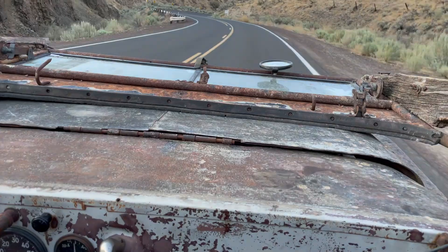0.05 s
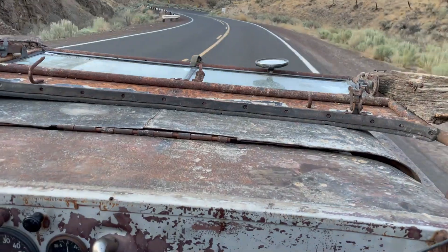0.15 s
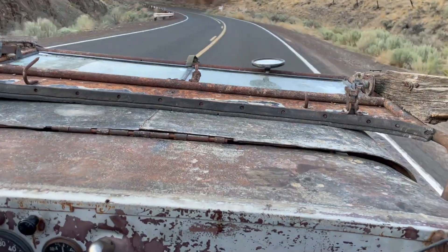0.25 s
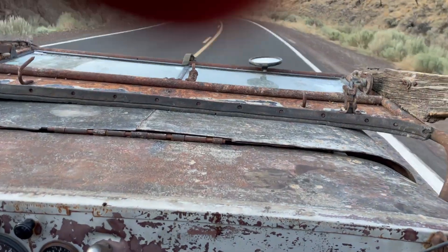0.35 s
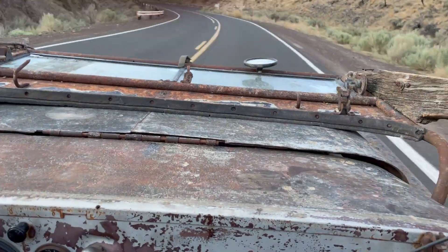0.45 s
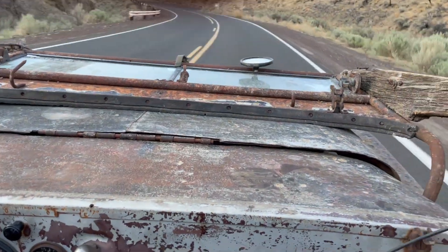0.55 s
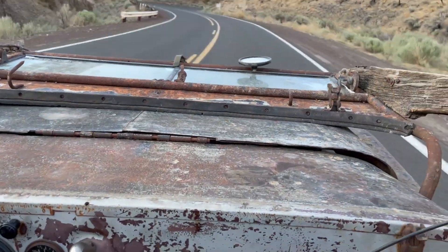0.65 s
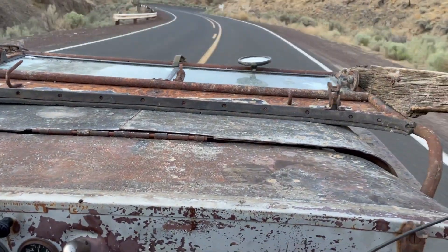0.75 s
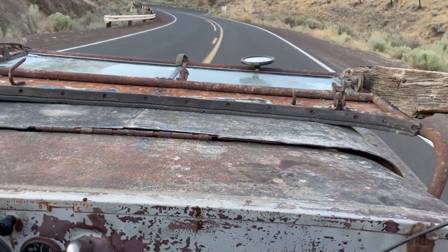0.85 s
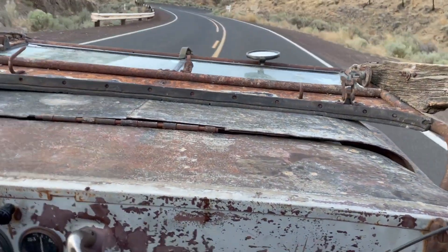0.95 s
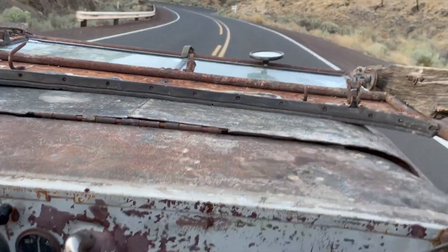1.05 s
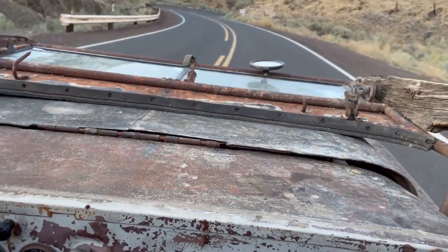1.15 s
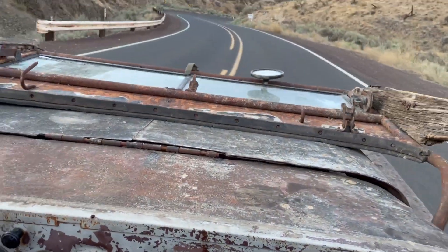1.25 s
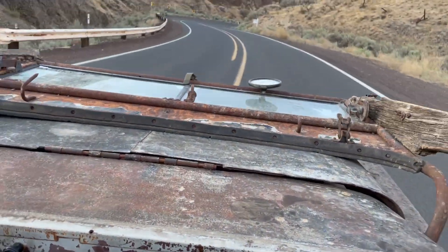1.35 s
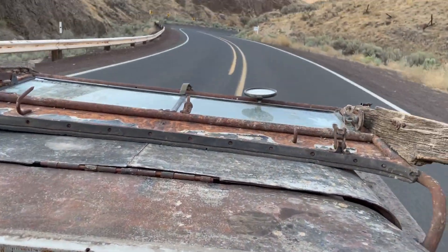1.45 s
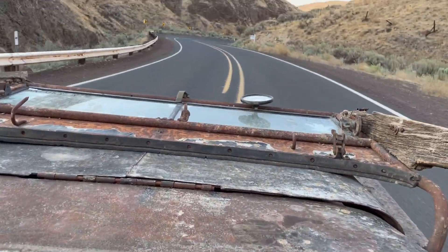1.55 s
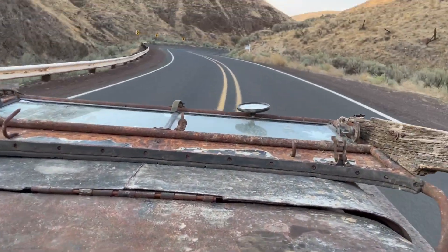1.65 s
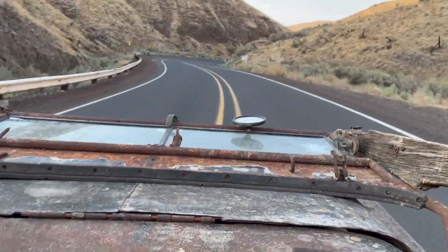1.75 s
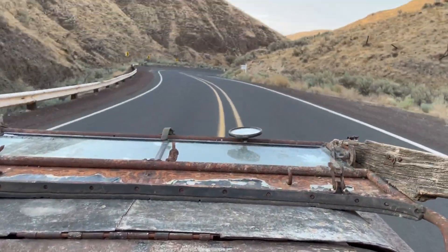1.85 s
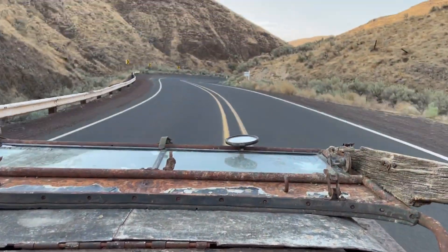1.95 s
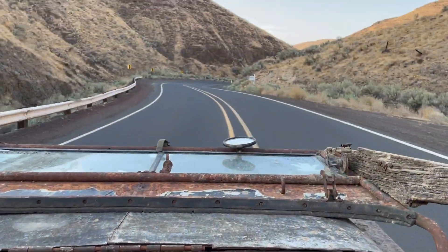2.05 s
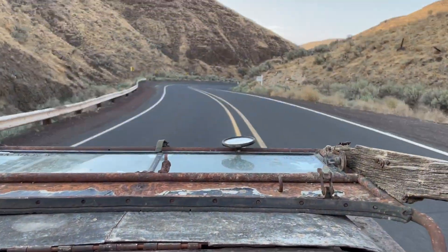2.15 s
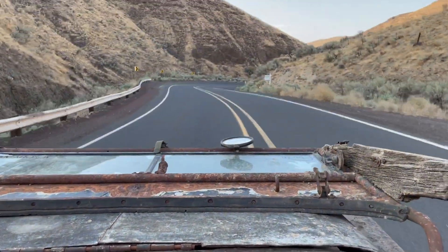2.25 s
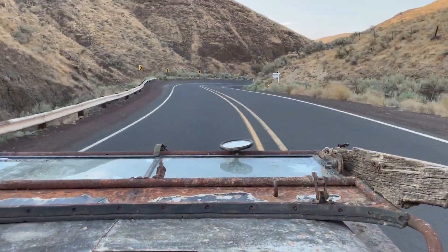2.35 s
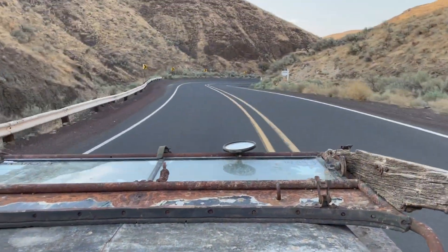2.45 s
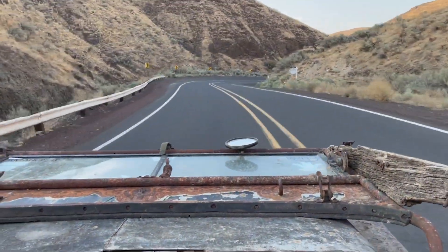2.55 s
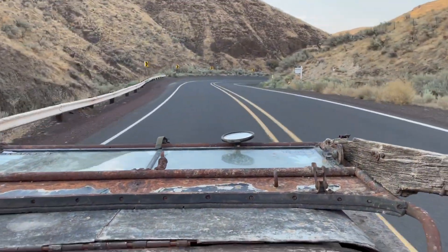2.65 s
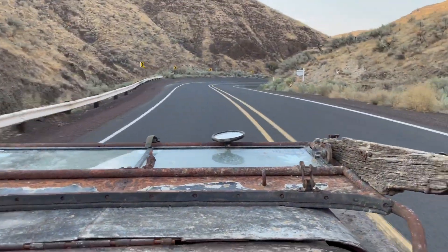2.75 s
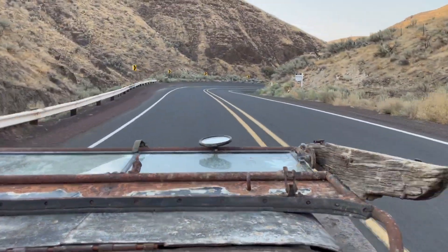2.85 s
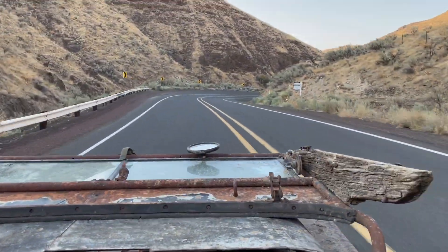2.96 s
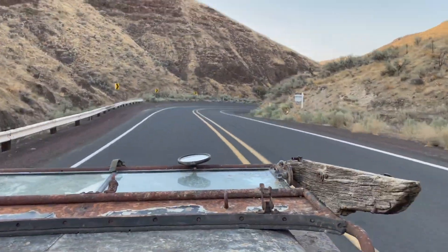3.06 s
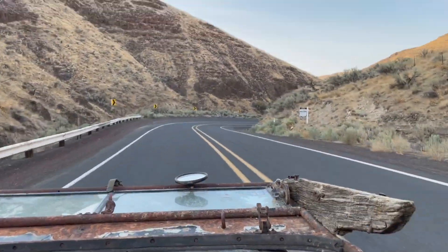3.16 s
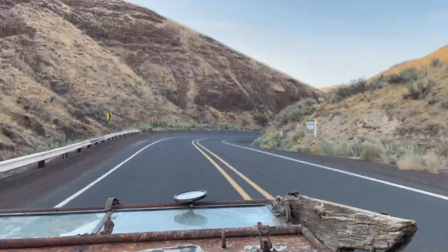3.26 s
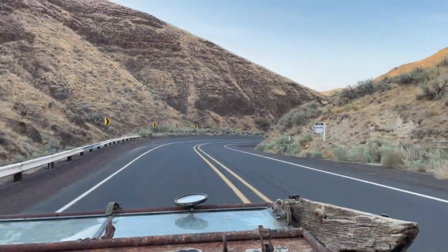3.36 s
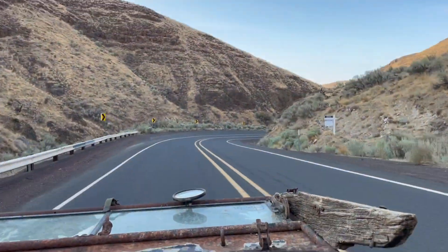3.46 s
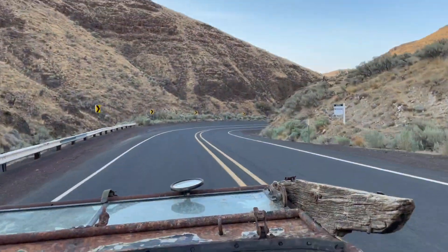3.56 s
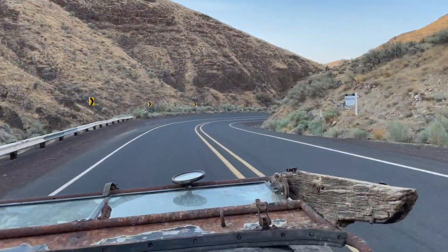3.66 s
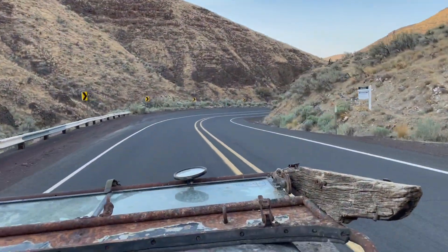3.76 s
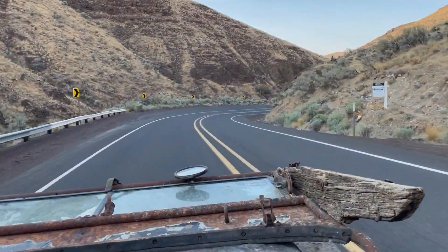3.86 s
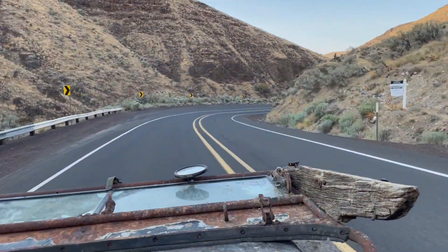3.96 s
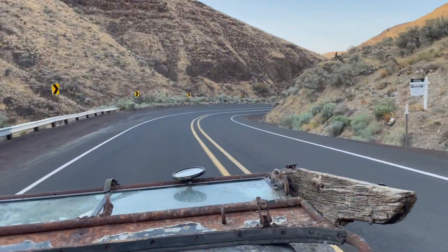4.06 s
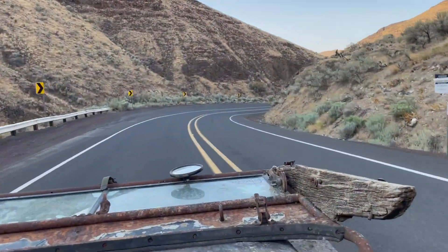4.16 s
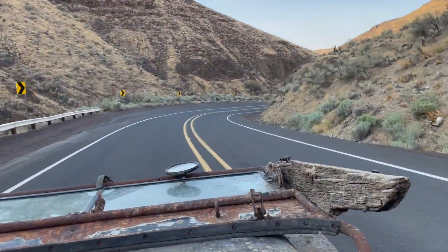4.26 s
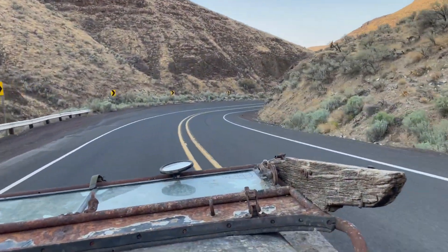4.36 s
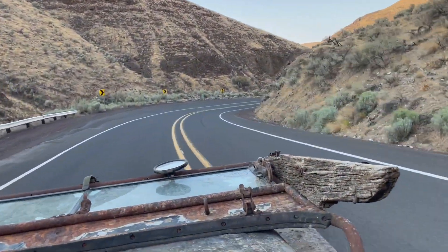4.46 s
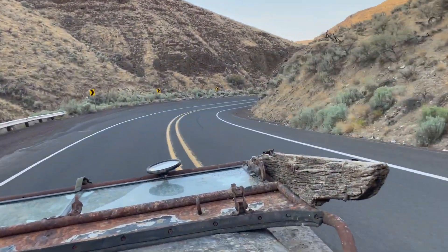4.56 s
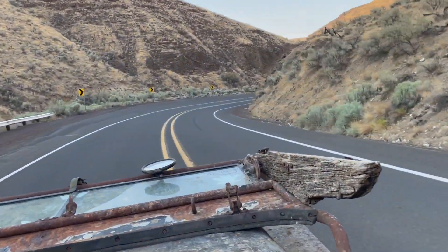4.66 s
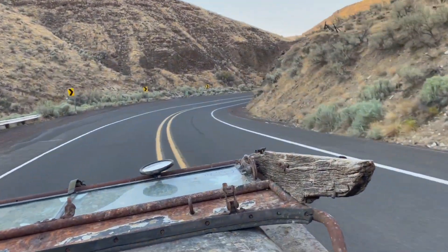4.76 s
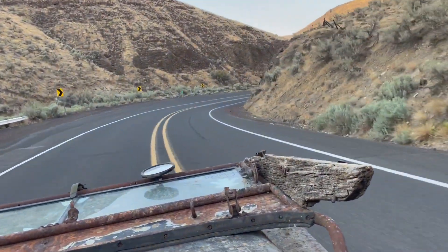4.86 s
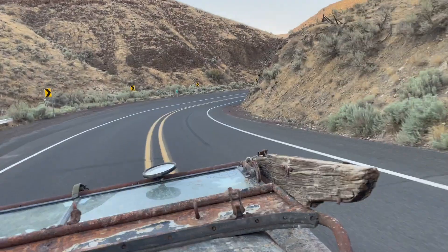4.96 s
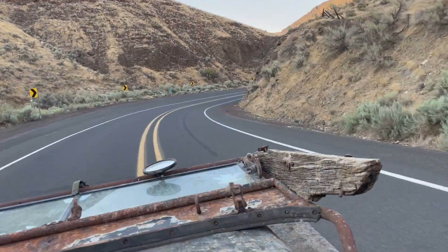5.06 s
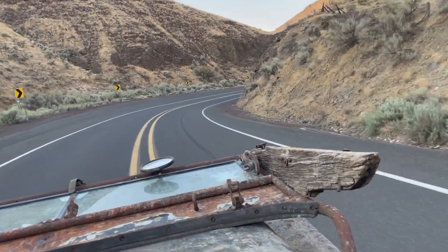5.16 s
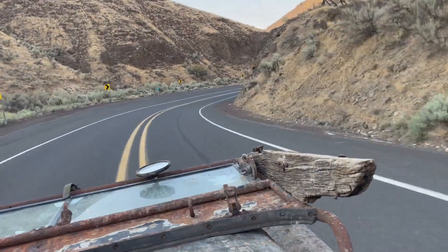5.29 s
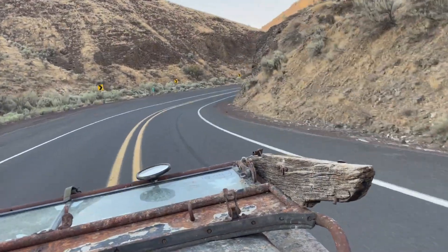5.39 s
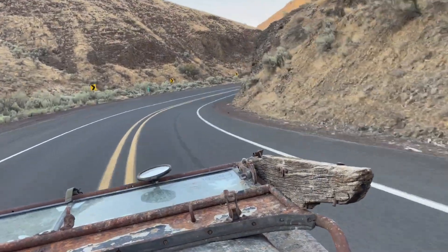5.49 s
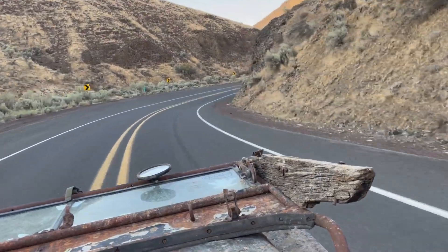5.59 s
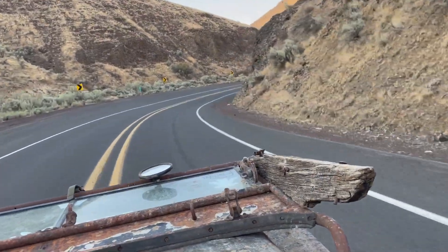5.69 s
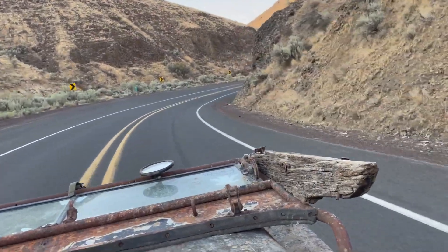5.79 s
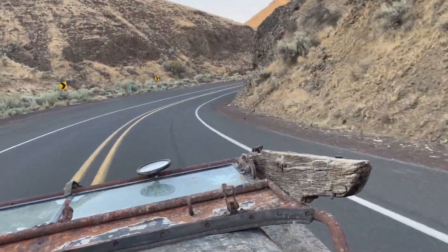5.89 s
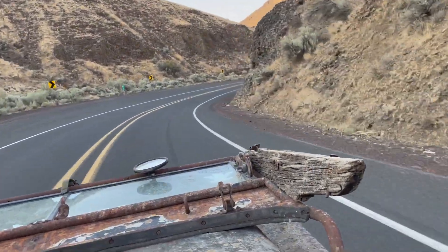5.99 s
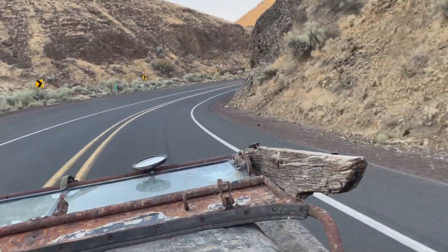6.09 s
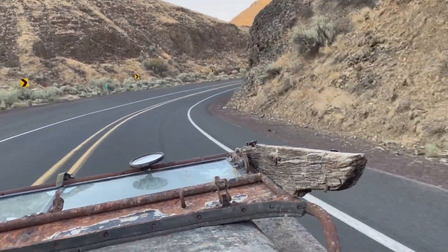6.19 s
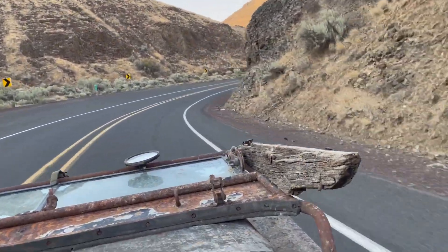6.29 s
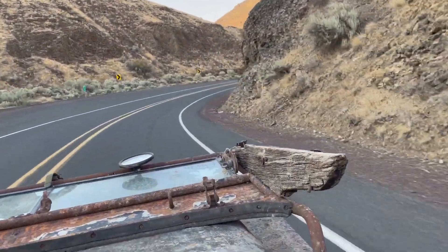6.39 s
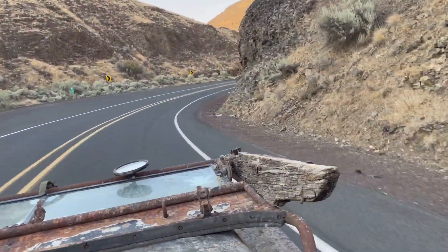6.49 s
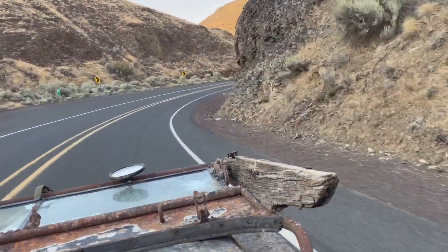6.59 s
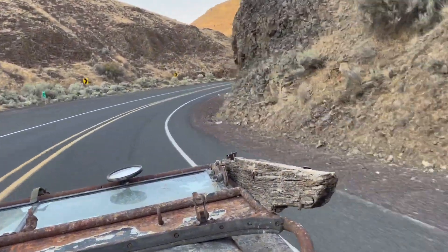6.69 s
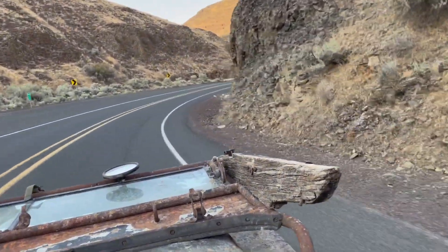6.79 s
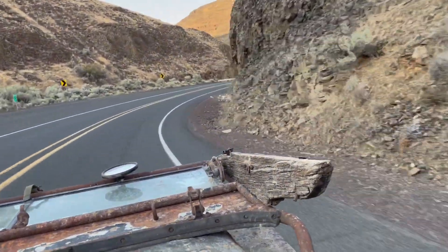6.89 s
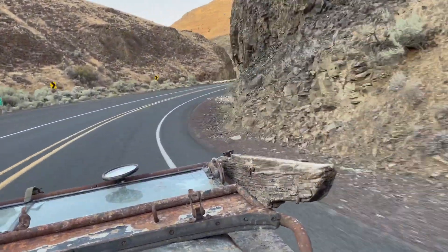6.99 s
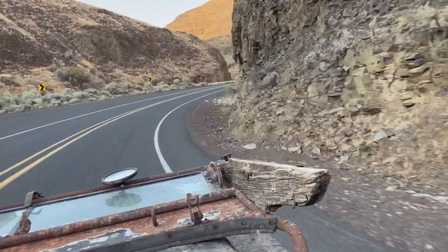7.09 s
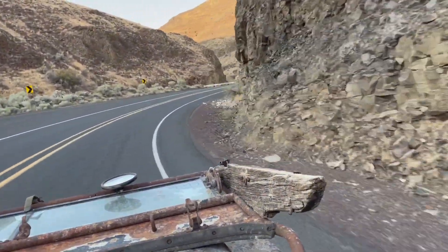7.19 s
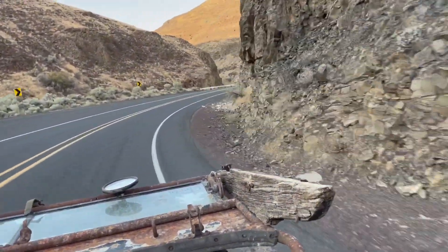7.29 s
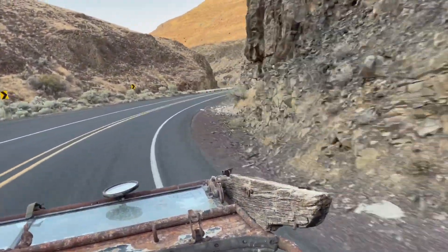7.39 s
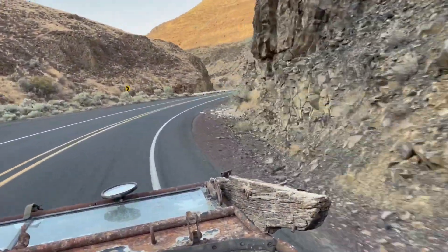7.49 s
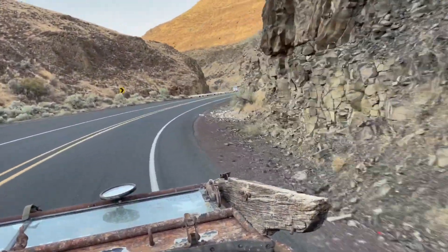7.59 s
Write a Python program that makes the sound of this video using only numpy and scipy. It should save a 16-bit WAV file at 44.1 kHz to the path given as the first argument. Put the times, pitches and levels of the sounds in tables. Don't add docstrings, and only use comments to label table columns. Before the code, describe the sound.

Strong wind buffets the microphone on a fast open vehicle, roaring, thumping and crackling over a steady low rumble of engine and tyres.

```python
import sys
import numpy as np
from scipy import signal
from scipy.fft import rfft, irfft, next_fast_len
from scipy.io import wavfile
from scipy.ndimage import uniform_filter1d

SR = 44100
rng = np.random.default_rng(int(sys.argv[2]) if len(sys.argv) > 2 else 0)


def makeup_ratio(level_db):
    decades = np.asarray(level_db, float) / 20
    return 10 ** decades


def output_pcm(signal):
    pcm = np.clip(np.atleast_2d(signal).T, -1, 1) * 32767
    wavfile.write(sys.argv[1], SR, np.round(pcm).astype(np.int16))


N = 336686
M = next_fast_len(N)
HZ = np.fft.rfftfreq(M, 1 / SR)

# [f/Hz, level/dB per Hz]
ROAD_SUM = [(24, -36), (40, -1.5), (97, -11), (239, -10), (406, -15), (473, -15), (865, -12.5), (1750, -19),
            (5580, -40.5), (6660, -38.5), (8790, -49), (11600, -46.5), (13500, -52), (14500, -96),
            (16500, -101)]
# [f/Hz, level/dB per Hz]
ROAD_DIFF = [(24, -32), (40, -13), (75, 1), (252, -9), (593, -2.5), (1110, -6.5), (3130, -21.5),
             (5440, -36), (6500, -34.5), (8150, -32.5), (9970, -40), (11000, -85), (13200, -43),
             (14900, -44), (16500, -72)]
# [t/s, level/dB]
ROAD_HISS = [
    (0.1, -59),
    (0.68, -57.5),
    (5.66, -62),
    (6.01, -60.5),
    (6.68, -62),
    (7.06, -60),
    (7.63, -59.5),
]
# [t/s, share of the tyre hiss level]
TURN = [
    (0, 0.087),
    (4.3, .1),
    (6.3, 0.39),
    (7.63, 0.37),
]
# [t/s, gust level/dB]
GUST = [(0.04, -22.5), (0.32, -19.5), (0.88, -19.5), (1.16, -15), (1.45, -12.5), (1.85, -16), (2.4, -14),
        (2.85, -14.5), (3.41, -12.5), (3.69, -18.5), (4.4, -19.5), (4.82, -18.5), (5.5, -20.5),
        (5.94, -17.5), (6.3, -26.5), (6.6, -22.5), (7.07, -19.5), (7.63, -20)]
# [t/s, left over right/dB]
SWING = [
    (0, -2),
    (2, -10),
    (7.63, -14),
]
# [f/Hz, level/dB per Hz]
WIND = [(18, -41), (30, -14), (54, 5), (75, 4.5), (150, -2), (451, -6), (829, -10.5), (1500, -17),
        (2500, -25.5), (3100, -31), (4160, -34), (5630, -40), (6600, -42.5), (8000, -60.5)]
# [f/Hz, likeness from 0 to 1]
SAME = [(60, 0.87), (180, 0.97), (550, 0.59), (1650, 0.14), (4970, 0.29), (15000, 0.04)]
# [f/Hz, left over right/dB]
LEAN = [(60, 1), (240, 2), (950, 1.5), (3770, 5), (15000, 12)]
# [peak t/s, level/dB, brightness/dB, length/s]
ROLLS = [(0.428, -15.5, -17, 0.061), (0.598, -18, -2.5, 0.019), (0.641, -25, -2, 0.027),
         (0.888, -11, -11.5, .025), (1.085, -6, -16.5, 0.016), (1.286, -10.5, -14.5, 0.039),
         (1.356, -12.5, -11, .046), (1.719, -16, -9.5, 0.063), (1.815, -7.5, -17, 0.027),
         (2.158, -11, -15, 0.046), (2.501, -9, -15, 0.051), (2.853, -10, -11.5, 0.047),
         (3.044, -12, -14, 0.051), (3.328, -14.5, -11, 0.051), (3.958, -13, -15.5, 0.034),
         (4.117, -16.5, -14, 0.065), (4.3, -16, -13, 0.018), (4.422, -13.5, -13.5, 0.027),
         (4.587, -13.5, -10.5, 0.024), (4.856, -12.5, -17, 0.093), (4.957, -14, -14.5, 0.065),
         (5.244, -9.5, -21, 0.054), (5.381, -12, -14.5, 0.04), (5.766, -10.5, -15, 0.023),
         (5.94, -7.5, -16, 0.017), (6.044, -15.5, -14, 0.017), (6.198, -19, -17, 0.045),
         (6.298, -16, -14.5, 0.024), (6.691, -16.5, -13, 0.018), (7.155, -7.5, -25, 0.016)]
# [peak t/s, level/dB, brightness/dB]
SLAPS = [(0.205, -17, -9), (0.702, -15.5, -22), (0.824, -14, -9), (1.007, -9, -15), (1.055, -13.5, -11),
         (1.24, -12, -14), (1.437, -7.5, -26), (1.568, -17, -2), (1.665, -21.5, -1.5), (1.934, -7, -16.5),
         (2.075, -8.5, -17), (2.106, -9.5, -18), (2.601, -7, -23), (2.668, -11.5, -11), (2.765, -15, -12),
         (2.977, -10, -13), (3.106, -5, -16.5), (3.248, -9.5, -10), (3.503, -9, -17), (3.846, -14, -16),
         (3.906, -10.5, -11.5), (4.524, -18, -6), (4.706, -11, -22), (5.033, -8.5, -24),
         (5.148, -10, -14.5), (5.445, -15, -17), (5.898, -11.5, -38), (6.846, -14.5, -12),
         (7.016, -10.5, -26), (7.06, -24, -3)]
# [t/s, peak level/dB, pitch f/Hz, port: 1 left, -1 right]
POPS = [(0.457, -10, 2200, 1), (0.5758, -7.5, 2420, 1), (0.6217, -7.5, 2220, 1), (3.253, -14, 3000, 1),
        (0.925, -10.5, 2480, 1), (0.9872, -11.5, 3330, 1), (1.1834, -13, 3460, 1), (1.3704, -5, 2730, 1),
        (2.8475, -10, 2950, 1), (1.5578, -6, 2950, 1), (1.7992, -7, 2650, 1), (1.963, -9.5, 2590, 1),
        (2.0668, -10, 3010, 1), (2.142, -9, 2780, 1), (2.182, -7, 2470, -1), (2.378, -5, 2470, 1),
        (2.734, -4, 2160, 1), (2.7415, -11, 2480, -1), (3.039, -15, 2700, -1), (3.8055, -16, 2410, -1),
        (4.526, -12, 2430, 1), (4.5859, -16, 2410, -1), (4.5934, -8, 3460, 1), (4.9124, -8.5, 2770, 1),
        (5.1932, -7, 2280, 1), (5.3587, -12, 2790, -1), (5.9407, -18, 2550, 1), (6.871, -14, 3040, 1),
        (7.0508, -7, 2860, 1), (7.066, -19, 2420, -1)]
# [f/Hz, width/Hz, depth/dB]
NULLS_SUM = [(5460, 570, -2.5), (8300, 770, -4), (15200, 1200, -9)]
# [f/Hz, width/Hz, depth/dB]
NULLS_DIFF = [(4300, 300, -5), (6700, 300, -4), (11500, 1000, -4)]

START_S = 0.0355
TOP_HZ = 15830
USUAL_DB = -18
FIZZ_DB, FIZZ_SLOPE = -10.5, -0.12
THUD_DB, THUD_SLOPE = -22.5, 0.77
SLAP_S = 0.013
EDDY_SIDE = 0.54
FAR_PORT_DB = -8.5


def evened(x):
    return x / np.sqrt(np.mean(x ** 2) + 1e-20)


def read(points, hz):
    f, value = np.transpose(points)
    return np.interp(np.log(hz + 1), np.log(f + 1), value)


def follow(table):
    s, value = np.transpose(table)
    return np.interp(np.arange(N) / SR, s, value)


def band(lo_hz, hi_hz):
    low_edge = 1 + (lo_hz / (HZ + 1)) ** 4
    high_edge = 1 + (HZ / hi_hz) ** 4
    return 1 / np.sqrt(low_edge * high_edge)


def flutter(lo_hz, hi_hz, rows):
    z = rfft(rng.standard_normal((rows, M))) * band(lo_hz, hi_hz) / np.sqrt(HZ + 1)
    return evened(irfft(z, M)[:, :N])


def sides(pan_db):
    return makeup_ratio(np.array([pan_db / 2, -pan_db / 2]))


def road():
    colour = makeup_ratio(np.array([read(ROAD_SUM, HZ), read(ROAD_DIFF, HZ) - 7.0]))
    z = rfft(rng.standard_normal((2, M))) * colour
    hiss = irfft(z[0] * (abs(HZ - 11250) < 1750), M)
    level = makeup_ratio(follow(ROAD_HISS) - 2.0 + 2.5 * flutter(7.5, 34, 1))
    both, apart = irfft(z, M)[:, :N] / np.std(hiss) * level
    return np.array([both + apart, both - apart])


def turned_hiss():
    hiss = irfft(rfft(rng.standard_normal(M)) * (abs(HZ - 8400) < 700), M)[:N]
    return follow(TURN) * evened(hiss) * makeup_ratio(follow(ROAD_HISS))


def airstream():
    roar_db = follow(GUST)
    over_db = roar_db - USUAL_DB
    fizz_db = roar_db + FIZZ_DB + FIZZ_SLOPE * over_db
    thud_db = THUD_DB + THUD_SLOPE * over_db
    return roar_db, fizz_db, thud_db


def eddies():
    roar, fizz = np.zeros((2, 2, N))
    slaps = [(*slap, SLAP_S) for slap in SLAPS]
    for s, db, bright_db, length in [*ROLLS, *slaps]:
        half = int(max(length, 0.004) * SR)
        at = np.clip(round(s * SR) + np.arange(-half, half), 0, N - 1)
        swell = np.hanning(2 * half) ** 0.71
        roar[:, at] += makeup_ratio(db - 3.0) * swell
        fizz[:, at] += makeup_ratio(db + bright_db + 1.0) * swell
    pan_db = EDDY_SIDE * follow(SWING)
    return roar * sides(0.24 * pan_db), fizz * sides(pan_db)


def pop(hz, edge_db):
    t = (np.arange(200) - 100) / SR
    ring = np.cos(2 * np.pi * (hz * t + rng.random())) * np.exp(-(t / 0.0003) ** 2)
    grit = rng.standard_normal((2, len(t)))
    dull_grit = signal.lfilter(*signal.butter(N=4, Wn=4800, fs=SR), grit[0])
    crack = evened(dull_grit) * np.exp(-(t / 0.0011) ** 2)
    edge = grit[1] * np.exp(-(t / 0.00047) ** 2)
    return makeup_ratio(0.5) * ring + makeup_ratio(-11.5) * crack + makeup_ratio(edge_db) * edge


def pops(burst_fizz):
    out = np.zeros((2, N + 200))
    for s, db, hz, port in POPS:
        port_gain = makeup_ratio(FAR_PORT_DB * np.array([port < 0, port > 0]))[:, None]
        edge_db = -31 + 1.2 * (db + 12) + (hz - 2700) / 150
        start = round(s * SR) - 100
        out[:, start:start + 200] += makeup_ratio(db - 1) * port_gain * pop(hz, edge_db)
    level = np.hypot(makeup_ratio(airstream()[1] - 3.5), burst_fizz)
    for hz in (1530, 2020, 2740, 3750, 5030):
        size = level * makeup_ratio(3.5 * np.minimum(rng.exponential(1, (2, N)), 3.5))
        train = size * (rng.random((2, N)) < 36 / SR)
        small = signal.oaconvolve(train, pop(hz, -45.0)[None])[:, :N]
        out[:, :N] += makeup_ratio(7.5 + read(WIND, hz) / 2) * small
    return out[:, :N]


def pair(gain):
    a, b = rfft(rng.standard_normal((2, M)))
    same = np.clip(read(SAME, HZ), -1, 1)
    lean = makeup_ratio(read(LEAN, HZ) / 2)
    left = a * lean
    right = (same * a + np.sqrt(1 - same ** 2) * b) / lean
    return evened(irfft(gain * np.array([left, right]), M)[:, :N])


def swirled(x, patchy_db, size):
    overlap = size * 3 // 4
    z = signal.stft(x, nperseg=size, noverlap=overlap)[2]
    patches = uniform_filter1d(rng.standard_normal(z.shape), size=4, axis=1)
    patches = evened(uniform_filter1d(patches, size=14, axis=2))
    z = z * makeup_ratio(patchy_db * patches)
    return evened(signal.istft(z, nperseg=size, noverlap=overlap)[1][:, :N])


def wind(burst_roar, burst_fizz):
    roar_db, fizz_db, thud_db = airstream()
    pan_db = follow(SWING)
    shared = flutter(7, 70, 1)
    own_roar, own_fizz = flutter(18, 200, 4).reshape(2, 2, N)
    colour = makeup_ratio(read(WIND, HZ))

    thud_level = makeup_ratio(thud_db + 2.9 * flutter(8.8, 23, 1))
    thud = pair(colour * band(15, 175)) * np.hypot(thud_level, 0.39 * burst_roar.mean(0))

    roar_level = makeup_ratio(roar_db - 4.0 + 2.64 * shared + 2.04 * own_roar) * sides(0.11 * pan_db)
    roar = swirled(pair(colour * band(188, 1115)), patchy_db=3.0, size=512)
    roar = roar * np.hypot(roar_level, burst_roar)

    fizz_level = makeup_ratio(fizz_db - 3.0 + 1.94 * shared + 3.05 * own_fizz) * sides(pan_db)
    fizz = swirled(pair(colour * band(1514, 12400)), patchy_db=3.5, size=256)
    fizz = fizz * np.hypot(fizz_level, burst_fizz)
    rasp = makeup_ratio(1.8 * flutter(66, 620, 2) - 0.4)
    return thud + roar + fizz * rasp


def scene():
    burst_roar, burst_fizz = eddies()
    return road() + pops(burst_fizz) + wind(burst_roar, burst_fizz)


def nulls(table):
    return makeup_ratio(sum(db * np.exp(-((HZ - hz) / width) ** 4) for hz, width, db in table))


def band_limit(x):
    return signal.sosfilt(signal.butter(12, 15830, fs=SR, output="sos"), x)


def record(dry):
    left, right = np.tanh(dry / 1.05) * 1.05
    gain = np.array([nulls(NULLS_SUM), nulls(NULLS_DIFF)])
    z = rfft([left + right, left - right], M) / 2 * gain
    z = z * band(40, 10 * SR) * (HZ < TOP_HZ)
    both, apart = irfft(z, M)[:, :N]
    both = both + turned_hiss()
    fade_out = np.minimum(np.arange(N)[::-1] / 300, 1)
    begun = (np.arange(N) >= START_S * SR) * fade_out
    mix = begun * np.array([both + apart, both - apart])
    return band_limit(mix)


dry = scene()
out = record(dry)
output_pcm(out)
```